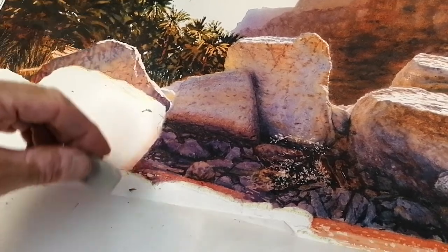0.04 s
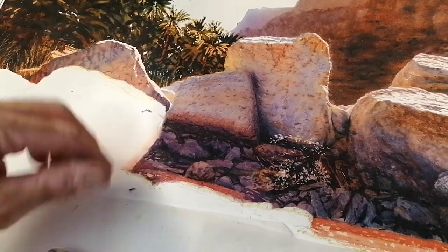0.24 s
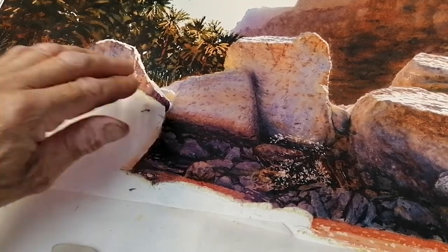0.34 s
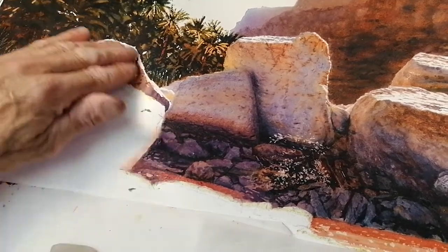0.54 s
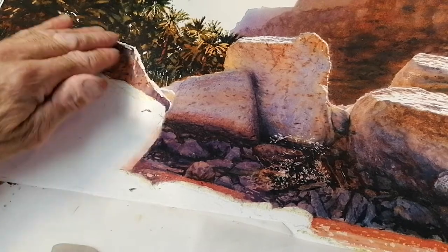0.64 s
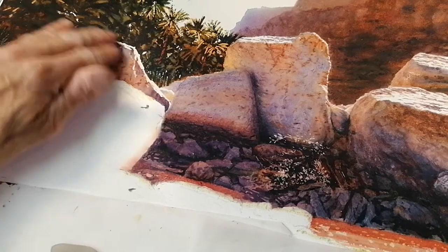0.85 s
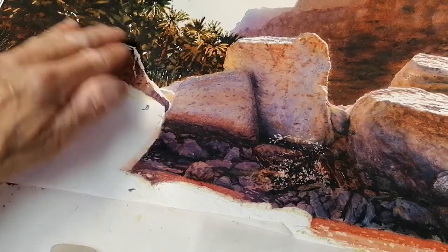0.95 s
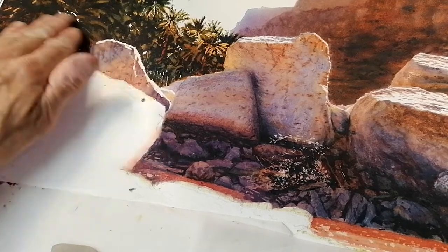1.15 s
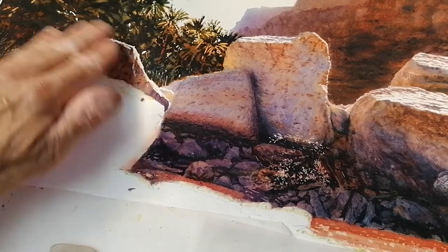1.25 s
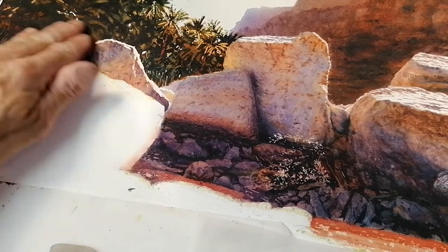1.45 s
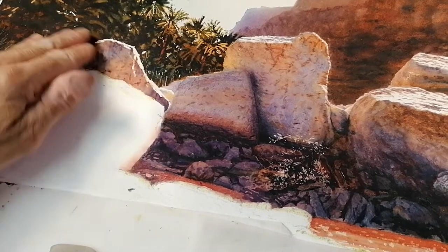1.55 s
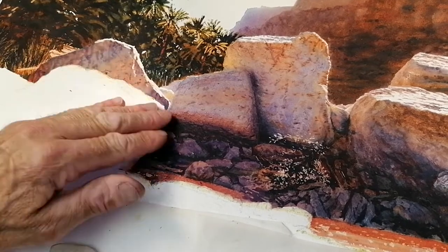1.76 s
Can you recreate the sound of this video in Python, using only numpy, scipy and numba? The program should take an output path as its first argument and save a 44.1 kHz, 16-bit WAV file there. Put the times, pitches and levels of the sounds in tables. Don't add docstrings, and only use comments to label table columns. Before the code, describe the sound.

Dry hand sweeps across thick paper, four short swishes, preceded by a small clack and finger taps

```python
import sys
import numpy as np
from scipy import signal
from scipy.fft import rfft, irfft
from scipy.io import wavfile
from scipy.ndimage import uniform_filter1d
from numba import njit

SR = 44100
rng = np.random.default_rng(int(sys.argv[2]) if len(sys.argv) > 2 else 0)


def makeup_ratio(level_db):
    decades = np.asarray(level_db, float) / 20
    return 10 ** decades


def master(y):
    cut = np.clip(np.atleast_2d(y).T, -1, 1)
    pcm = np.round(cut * 32767)
    wavfile.write(sys.argv[1], SR, pcm.astype(np.int16))


N = 79380
T = np.arange(N) / SR
MID_SIDE = np.array([[1], [-1]])


def unit(x):
    return x / np.sqrt(np.mean(x ** 2))


@njit
def svf(x, hz, width_hz):
    y, b, l = np.empty(len(x)), 0., 0.
    for i in range(len(x)):
        g, k = np.tan(np.pi * hz[i] / SR), width_hz / hz[i]
        v = (b + g * (x[i] - l)) / (1 + g * (g + k))
        b, l, y[i] = 2 * v - b, l + 2 * g * v, k * v
    return y


def band(x, hz, width_hz):
    hz = np.clip(hz + np.zeros(len(x)), 1, SR / 2.5)
    once = svf(x, hz, 1. * width_hz)
    return svf(once, hz, 1. * width_hz)


def colour(x, table):
    freq_hz = np.fft.rfftfreq(N, 1 / SR) + 1
    point_hz, point_db = np.array(table).T
    gain = makeup_ratio(np.interp(np.log(freq_hz), np.log(point_hz), point_db))
    return unit(irfft(rfft(x) * gain, N))


def walk(rate_hz):
    k = int(SR / rate_hz)
    return unit(uniform_filter1d(uniform_filter1d(rng.standard_normal(N), k), k))


def ring(x, hz, t60_s):
    pole = np.exp(2j * np.pi * hz / SR - np.log(1000) / (t60_s * SR))
    return signal.lfilter([1], [1, -pole], x).imag


def slips():
    per_s, spread_db = 14000, 3.5
    sign, size = rng.standard_normal((2, N))
    hit = rng.random(N) < per_s / SR
    return unit(hit * np.sign(sign) * makeup_ratio(spread_db * np.clip(size, -2, 2)))


def skin(curves, sheet, hollow_db):
    # (frequency [Hz], level [dB])
    fibre = [(250, -23.5), (500, -14), (1300, -9.5), (1900, -1), (5500, 7.5), (10500, -2), (12500, -5.5),
             (15300, -12.5)]
    # (frequency [Hz], width [Hz], level [dB])
    gap_modes = [(5480, 270, -22), (7540, 850, -21), (9720, 5100, -12.5)]
    base_hz, rise, width_hz, closed_db, fade_db = 2514, 0.22, 1150, 2.5, -25.5
    overtone, overtone_width_hz, overtone_db = 1.216, 990, -13.5
    shared = 0.61

    gain, opening = np.zeros(N), np.zeros(N)
    for rows in curves:
        s, db, o = np.array(rows).T
        inside = (T >= s[0]) & (T <= s[-1])
        gain += inside * makeup_ratio(np.interp(T, s, db))
        opening += inside * np.clip(np.interp(T, s, o), 0, 1)

    catch = makeup_ratio(.9 * walk(150))
    gap_now = [(hz * (1 + .04 * walk(15)), w, db + 2.2 * walk(30)) for hz, w, db in gap_modes]
    sheet_now = [(hz * (1 + .012 * walk(20)), w, makeup_ratio(db + 3 * walk(35))) for hz, w, db in sheet]
    hollow_hz = base_hz * (1 + rise * opening ** 2 + .025 * walk(30))
    closed = makeup_ratio(closed_db + hollow_db + fade_db * opening)
    common = slips() * catch
    patches = []
    for _ in range(3):
        grit = slips() * catch
        near = grit + shared * common
        gaps = sum(makeup_ratio(db) * unit(band(grit, hz, w)) for hz, w, db in gap_now)
        hollow = closed * unit(band(near, hollow_hz, width_hz))
        second = unit(band(near, overtone * hollow_hz, overtone_width_hz))
        hollow += makeup_ratio(overtone_db) * np.sqrt(closed) * second
        hollow += sum(g * unit(band(near, hz, w)) for hz, w, g in sheet_now)
        paper = unit(colour(grit, fibre) + gaps) * np.sqrt(opening + 0.051)
        patches.append(gain * (paper + hollow))
    return np.array(patches)


def palm_sweeps():
    # (time [s], pressure [dB], hand opening [0-1])
    strokes = [
        [(0.572, -105, 0.4), (0.578, -53, 0.07), (0.588, -39, 0.48), (0.618, -40, 0.72), (0.636, -46, 0.65),
         (0.672, -64.5, 0.8), (0.7, -87, 0.5)],
        [(0.778, -99, 0.4), (0.788, -60.5, 0.22), (0.814, -65, 0.2), (0.834, -43.5, 0.58), (0.86, -38, 0.63),
         (0.906, -38.5, 0.86), (0.98, -75.5, 0.75), (0.99, -75, 0.6)],
        [(1.078, -126, 0), (1.088, -58, 0.1), (1.096, -40.5, 0.32), (1.14, -36, 0.65), (1.178, -39.5, 0.89),
         (1.27, -85.5, 0.56)],
        [(1.355, -90, 0.2), (1.365, -81, 0.07), (1.378, -63, 0.18), (1.391, -46.5, 0.32), (1.415, -37.5, 0.44),
         (1.473, -39.5, 1), (1.521, -45, 1), (1.539, -55, 1), (1.62, -78.5, 0.2)],
    ]
    # (time [s], pressure [dB], hand opening [0-1])
    next_stroke = [(1.782, -77, 0.42), (1.793, -69.5, 0.19), (1.81, -55, 0)]
    # (frequency [Hz], width [Hz], level [dB])
    sheet_modes = [(2520, 250, -24), (3390, 200, -26), (3730, 200, -24), (5750, 350, -23), (6800, 300, -26),
                   (7530, 350, -26), (9500, 600, -26)]
    return makeup_ratio(5.5) * skin(strokes + [next_stroke], sheet_modes, 0)


def resting_drag():
    # (time [s], level [dB], hand opening [0-1])
    drag = [(.236, -81, 1), (.26, -59, 0.11), (.40, -54, 0.05), (.56, -61, 0.1), (.70, -62.5, 0.1),
            (.77, -74, 0), (.98, -70, 0), (1.07, -97, 0), (1.30, -97, 0.53), (1.58, -72, 1),
            (1.70, -68, 0.78), (1.8, -69, 0.36)]
    # (frequency [Hz], width [Hz], level [dB])
    sheet_modes = [(1840, 90, -17), (2220, 200, -18), (3620, 350, -15), (5800, 450, -22), (6900, 500, -24),
                   (9500, 1600, -19)]
    return skin([drag], sheet_modes, -6)


def fingers():
    scuff_s = [.2355, .242, .2355, .250, .294, .305, .322, .339, .347, .380, .463, .150, .462, 1.555, 1.367]
    # (length [s], level [dB], centre [Hz], width [Hz])
    scuffs = [(0.0092, -32.5, 1900, 2600), (0.023, -40.5, 2070, 3100), (0.014, -72, 9600, 4400),
              (0.034, -52.5, 800, 2100), (0.019, -52, 1600, 2500), (0.019, -43, 2600, 2350),
              (0.088, -52, 1660, 3700), (0.0095, -40, 2170, 930), (0.012, -41, 720, 2900),
              (0.012, -50.5, 2800, 3400), (0.044, -50.5, 1550, 8000), (0.024, -67, 9200, 2500),
              (0.28, -69.5, 690, 690), (0.056, -58.5, 780, 3800), (0.0078, -65, 4200, 1900)]
    # (time [s], level [dB], frequency [Hz], t60 [s])
    ticks = [(.1393, -51, 9300, .0015), (.1393, -56, 14000, .001), (.1485, -37, 9600, .0032),
             (.1485, -47, 6500, .001), (.2482, -33, 9300, .003), (.2481, -30, 6000, .0015),
             (.3289, -32, 5200, .0012), (.3290, -38, 9800, .002), (.3476, -23, 5300, .005),
             (.3476, -33, 8500, .0015), (.3492, -33, 5600, .004), (.3805, -43, 5500, .002),
             (.3855, -37, 4800, .002), (.3900, -40, 2700, .006), (.4660, -46, 5800, .012),
             (1.4933, -31, 5500, .002), (.2948, -43, 4500, .002), (.2968, -45, 3600, .005),
             (.3078, -38, 4500, .002), (.3095, -37, 3300, .003), (.3140, -38, 2600, .008),
             (.3220, -45, 5800, .003), (.3240, -44, 3600, .003), (.3392, -42, 2050, .02),
             (.3540, -40, 5500, .004), (.3475, -37, 760, .03), (.2360, -23, 2000, .022),
             (.2384, -29, 2150, .012), (.2422, -27, 2450, .015), (.2447, -34, 1710, .02),
             (.2400, -39, 6000, .012), (.2575, -41, 6200, .004), (.265, -44, 142, .25),
             (.345, -45, 185, .3), (.385, -47, 108, .2), (.285, -45, 55, .25), (.455, -47, 235, .15),
             (1.3685, -47, 2600, .02)]
    out, grit = np.zeros((3, N)), [slips() for _ in range(3)]
    for s, (length_s, db, hz, width_hz) in zip(scuff_s, scuffs):
        u = np.clip((T - s) / length_s, 0, None)
        shape = makeup_ratio(db + 1.8 * walk(350)) * np.minimum(u * 10, 1) * np.exp(-1.6 * u ** 1.6)
        out += [shape * unit(band(g, hz, width_hz)) for g in grit]
    for s, db, hz, t60_s in ticks:
        click = 1. * (np.arange(N) == int(s * SR))
        out[0] -= makeup_ratio(db) * ring(click, hz, t60_s)
    return out


def board():
    # (time [s], level [dB], contact [s])
    blows = [
        (0.2347, -18.5, 0.00064),
        (0.2435, -30.5, 0.00091),
        (.2475, -29, 0.00034),
        (0.2923, -34.5, 0.00032),
        (0.307, -32, 0.00043),
        (0.347, -30, 0.00038),
        (0.387, -39, 0.00038),
        (0.462, -32.5, 0.00085),
        (1.092, -40.5, 0.0011),
        (1.563, -76, 0.0005),
    ]
    # (frequency [Hz], level [dB], t60 [s])
    modes = [(134, -7, 0.27), (198.3, -15, 0.29), (237.3, 1.5, 0.084), (389, 6.5, 0.07), (685, 1.5, 0.096),
             (796, 8, 0.073), (1330, -11, 0.036), (1750, -16, 0.027), (1960, -4, 0.04), (2430, -6, .03)]
    # (time [s], level [dB])
    weight = [(0.2, -106), (0.236, -61), (0.32, -52.5), (0.36, -57), (0.42, -56), (0.484, -58.5),
              (0.552, -69.5), (0.806, -65), (0.832, -86), (1.036, -79), (1.1, -63), (1.168, -90),
              (1.246, -79.5), (1.366, -63), (1.478, -75), (1.568, -64.5), (1.8, -70)]
    # (frequency [Hz], width [Hz], level [dB])
    rumble_modes = [(102, 10, -1.5), (145, 9, -8.5), (197, 72, 3), (252.2, 34, -1.5), (390, 170, 0)]
    scatter_db, detune = 2.5, 0.017

    out = np.zeros((3, N))
    chance = rng.standard_normal((len(blows), 3, len(modes)))
    for (s, db, contact_s), rows in zip(blows, chance):
        push = np.exp(-((T - s - 2 * contact_s) / contact_s) ** 2)
        push /= -push.sum()
        for patch, share, row in zip(out, (1, .3, -.3), rows):
            for (hz, mode_db, t60_s), r in zip(modes, row):
                gain = share * makeup_ratio(db + mode_db - 17.5 + scatter_db * r)
                patch += gain * ring(push, hz * (1 + detune * r), t60_s)

    s, db = np.array(weight).T
    for patch, patch_db in zip(out, (.1, -5, -5)):
        rumble = sum(makeup_ratio(g) * unit(band(rng.standard_normal(N), hz, w)) for hz, w, g in rumble_modes)
        patch += makeup_ratio(np.interp(T, s, db) + patch_db) * unit(rumble)
    return signal.sosfilt(signal.butter(2, 90, "high", fs=SR, output="sos"), out)


def ports(patches, left_db):
    # (frequency [Hz], phase [rad])
    lead = [(0, 0), (600, .3), (2240, 1.9), (3300, 3.1), (5860, 5.5), (8100, 6.7), (10200, 7.6),
            (15400, 7.8)]
    diffuse, room_t60_s, room_db = .55, .15, -24
    n_s = np.arange(int(.6 * SR)) / SR
    lag_rad = np.interp(np.fft.rfftfreq(N, 1 / SR), *np.array(lead).T)
    out = []
    for side, lag, own in ((1, 0, patches[1]), (-1, lag_rad, patches[2])):
        late = irfft(rfft(patches[0]) * np.exp(-1j * lag), N)
        direct = np.sqrt(1 - diffuse) * late + np.sqrt(diffuse) * own
        tail = rng.standard_normal(len(n_s)) * 1000. ** (-n_s / room_t60_s) * (n_s > .004)
        room = signal.fftconvolve(direct, tail / np.linalg.norm(tail))[:N]
        out.append(makeup_ratio(side * left_db / 2) * (direct + makeup_ratio(room_db) * room))
    return np.array(out)


def room_air():
    # (frequency [Hz], level [dB])
    hush = [(20, -28), (60, -15.5), (400, -10), (1200, -18.5), (4000, -26.5), (10500, -35.5),
            (12000, -41.5), (15300, -49)]
    # (time [s], level [dB])
    rocking = [(0.0, -58.5), (0.224, -67), (0.304, -54.5), (0.39, -62), (0.456, -51.5), (0.656, -59.5),
               (0.866, -52), (0.906, -66), (1.082, -63), (1.108, -54), (1.328, -65), (1.358, -58),
               (1.598, -67), (1.8, -61)]
    mid, side = (colour(rng.standard_normal(N), hush) for _ in range(2))
    side = side - .5 * band(side, 100, 550)
    s, db = np.array(rocking).T
    gain = makeup_ratio(-4.9 + np.interp(T, s, db))
    sway_mid, sway_side = (gain * unit(band(rng.standard_normal(N), 33, 34)) for _ in range(2))
    return makeup_ratio(-72) * (mid + side * MID_SIDE) + sway_mid + 0.7 * sway_side * MID_SIDE


def scene():
    hand = palm_sweeps() + resting_drag() + fingers()
    return ports(hand, left_db=1.0) + ports(board(), left_db=2.5) + room_air()


def band_limit(x):
    return signal.sosfilt(signal.butter(12, 15860, fs=SR, output="sos"), x)


def record(dry):
    low_pass = signal.ellip(8, .1, 60, 15150, fs=SR, output="sos")
    mix = signal.sosfiltfilt(low_pass, dry)
    return band_limit(mix)


dry = scene()
out = record(dry)
master(out)
```